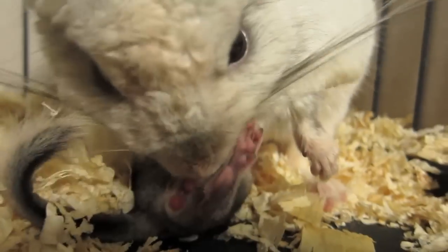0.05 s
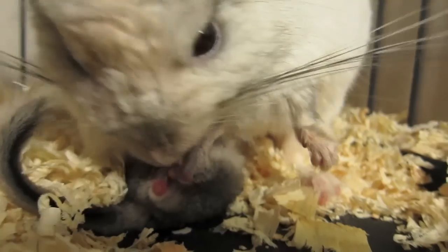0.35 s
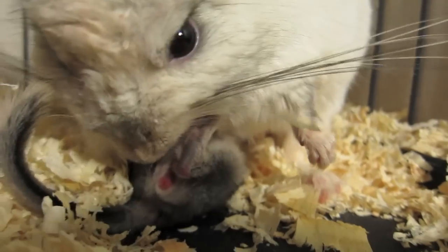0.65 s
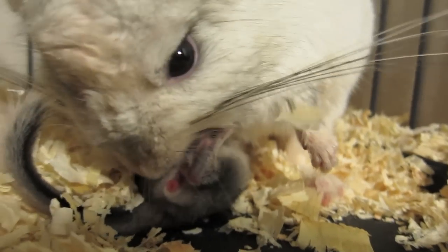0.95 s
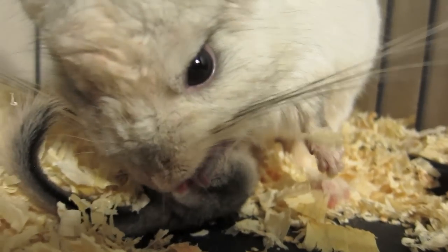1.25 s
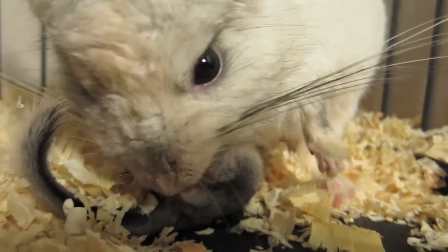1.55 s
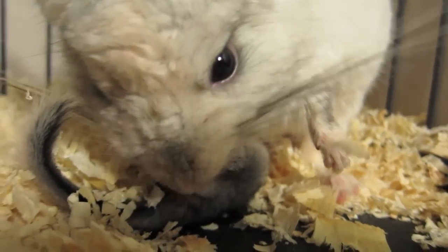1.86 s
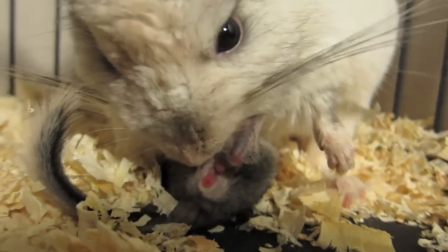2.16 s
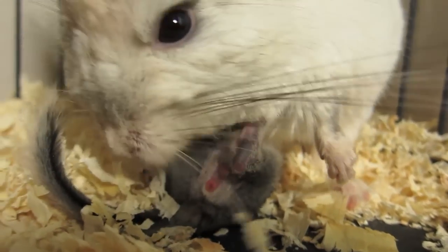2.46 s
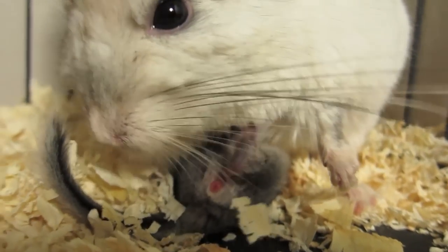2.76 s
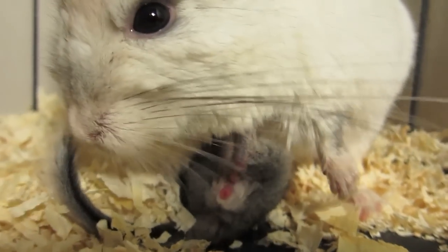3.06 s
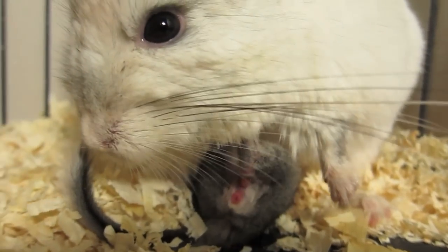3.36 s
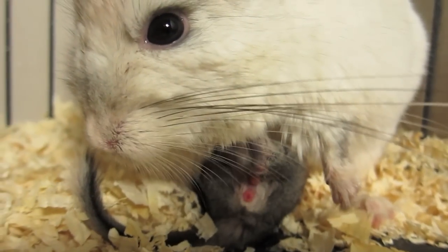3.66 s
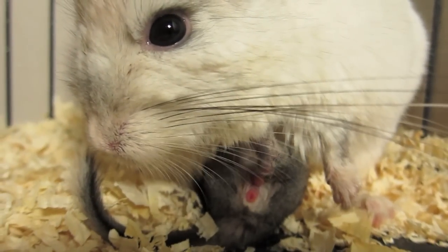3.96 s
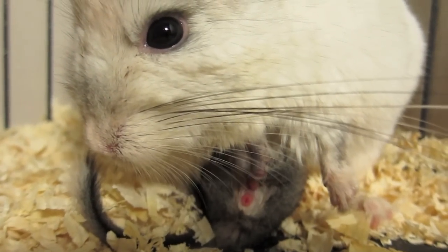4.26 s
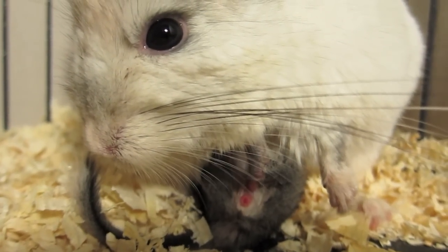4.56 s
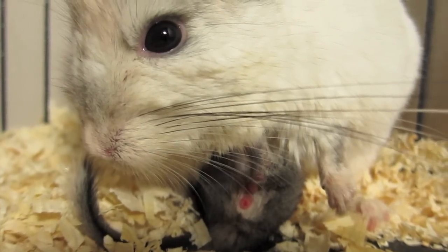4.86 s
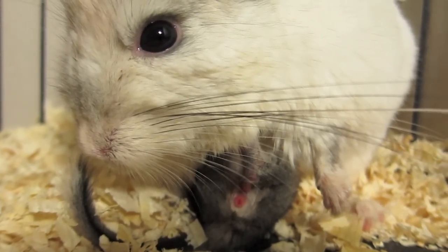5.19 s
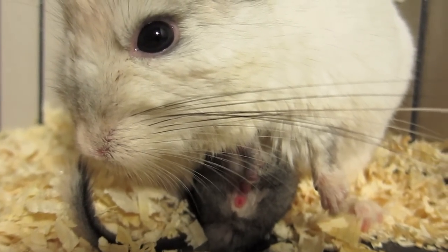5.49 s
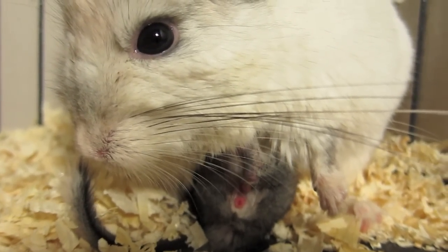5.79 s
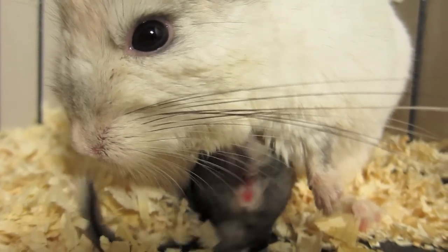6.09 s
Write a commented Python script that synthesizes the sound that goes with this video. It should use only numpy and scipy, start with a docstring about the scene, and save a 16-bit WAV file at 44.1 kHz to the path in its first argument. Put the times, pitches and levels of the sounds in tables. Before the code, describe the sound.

A baby chinchilla gives short harsh squeaks, then soft peeps, amid faint sniffing, soft bumps and crackling wood shavings in a quiet room.

```python
"""A newborn chinchilla under its mother in a cage of wood shavings, in a small room with a low hum.
It opens with two squeaks that start as a thin whistle, drop into a rasp as the vocal folds strain, then
relax. Four shorter calls follow by 2.1 s, while the grooming mother sniffs through narrow nostrils.
From 0.9 s paws bump and shuffle on the padded floor. After 3 s the kit gives only soft, falling peeps,
and the shavings, crackling throughout, end the scene with two dry ticks."""
import sys
import numpy as np
from scipy import signal
from scipy.fft import rfft, irfft
from scipy.io import wavfile
from scipy.ndimage import uniform_filter1d

SR = 44100
rng = np.random.default_rng(int(sys.argv[2]) if len(sys.argv) > 2 else 0)


def transcribe(u):
    """Save the signal u as a 16-bit wav file named by the first command-line argument.

    u: samples, shape (n,) or (channels, n), limited to [-1, 1]; the rate is SR.
    q: integer samples, one column per channel.
    """
    v = np.clip(np.atleast_2d(u).T, -1, 1)
    q = np.round(v * 32767).astype(np.int16)
    wavfile.write(sys.argv[1], SR, q)


N = 270333
TIME = np.arange(N) / SR
TOP_HZ = 15750

# room tone EQ, mid and side: (frequency [Hz], gain [dB])
AIR_MID_EQ = [(25, -12.5), (38, -4.5), (58, 0), (90, -7.5), (170, -10), (270, -13.5), (360, -12),
              (550, -15), (850, -18), (2000, -25.5), (6400, -32.5), (8500, -42), (11000, -35),
              (15500, -42.5)]
AIR_SIDE_EQ = [(25, -1), (55, 1.5), (170, -4), (400, -8), (700, -11), (1600, -16.5), (5000, -22),
               (7500, -28.5), (9000, -26), (15500, -33)]
# stereo balance of the room tone: (frequency [Hz], left minus right [dB])
AIR_BALANCE = [(50, 0), (110, 5), (200, 7.5), (400, 3), (1300, 1.5), (4400, 1.5), (9000, -3), (15000, 0)]
# faint camera whine: (frequency [Hz], wander width [Hz], level [dB])
WHINE_TONES = [(1672, 1.25, -74), (8806, 22.7, -76), (10830, 95, -77.5)]
# early reflections off nearby surfaces: (delay [s], level [dB], left share [0-1])
REFLECTIONS = [(.0075, -19.5, 0), (.024, -26, 0.35), (.034, -17.5, 0.6)]
# crackle EQ of dry shavings: (frequency [Hz], gain [dB])
CRACKLE_EQ = [(500, -4), (1500, 3.5), (4000, 0.5), (7000, -8.5), (11000, -10), (15000, -15)]
# the animals stir the bedding: (peak time [s], length [s], level [dB])
STIRS = [(.27, 0.58, -53), (1.055, 0.37, -51), (1.557, 0.22, -60), (2.047, 0.2, -52), (2.81, .2, -55.5),
         (2.997, 0.077, -54.5), (3.09, 0.061, -53), (3.486, 0.18, -58), (6.1, 0.14, -56)]
# single shavings snapping: (time [s], level [dB], ring [Hz])
SNAPS = [(0.326, -29, 4600), (.457, -36, 3460), (1.8324, -30.5, 5000), (1.9505, -26, 3580),
         (2.0254, -29, 11100), (2.369, -31, 1120), (2.562, -34, 1230), (2.8379, -25.5, 4000),
         (2.853, -35, 3200), (3.071, -35, 786), (3.4377, -31, 9900), (6.0493, -28, 3800),
         (6.0837, -31, 5000)]
# dull EQ of the padded floor: (frequency [Hz], gain [dB])
FLOOR_EQ = [(120, -26), (330, 9), (520, 2), (650, 1.5), (950, -1.5), (1400, -12), (3000, -38), (8000, -47)]
# fur and paws sliding: (time [s], length [s], level [dB])
SHUFFLE_CUES = [(0.933, 0.11, -51.5), (1.064, 0.13, -51.5), (2.742, 0.068, -52), (3.208, 0.086, -49.5),
                (3.804, 0.072, -52.5), (4.684, 0.086, -47), (4.877, 0.12, -51.5), (5.484, 0.044, -51),
                (5.795, 0.19, -51.5), (6.041, 0.098, -52.5)]
# paws and bodies bumping the floor: (time [s], pitch [Hz], level [dB])
BUMP_CUES = [(.932, 438, -22.5), (0.942, 138, -26.5), (.954, 312, -33), (3.246, 365, -34),
             (3.832, 543, -41), (4.715, 400, -39), (4.968, 470, -39), (5.795, 450, -36.5)]
# hiss EQ of the nostrils: (frequency [Hz], gain [dB])
NOSE_EQ = [(400, -1), (900, 8), (2400, 4.5), (3500, -0.5), (5300, 4.5), (7000, 3), (9000, -16),
           (11000, -3.5), (15000, -24)]
# the mother's sniffs: (time [s], length [s], level [dB], whistle pitch [Hz], whistle over hiss [dB])
SNIFF_CUES = [(0.454, 0.23, -50, 6300, -22), (0.663, 0.26, -52.5, 5400, -13), (0.904, 0.13, -48, 6600, -17),
              (1.098, 0.15, -49.5, 6500, -23), (1.396, 0.24, -51.5, 6070, -6), (2.171, 0.15, -50, 6540, -4),
              (2.383, 0.19, -50.5, 7000, -11), (2.689, 0.2, -52.5, 6100, -3)]
# the kit's soft peeps: (time [s], length [s], first pitch [Hz], level [dB])
PEEP_CUES = [(0.474, 0.017, 1080, -46.5), (.901, 0.017, 1045, -46.5), (1.416, 0.017, 1124, -51),
             (1.976, 0.018, 1020, -46), (2.616, 0.02, 1063, -48.5), (2.646, 0.022, 968, -49.5),
             (3.213, .019, 1016, -44), (3.239, 0.041, 878, -49.5), (3.807, .022, 982, -46),
             (4.698, 0.038, 1045, -48)]
# formants of the kit's throat and mouth: (frequency [Hz], gain [dB])
THROAT_EQ = [(500, 11), (800, 3.5), (1250, -5), (1650, 0.5), (2000, 4.5), (2600, -2.5), (3400, -8),
             (4100, -19.5), (4900, -17.5), (5700, -33), (8000, -42)]
# the kit's squeaks: (time [s], length [s], mid-call level [dB], swell [dB], whistle length [s],
# overtones [dB], roughness [0-1], time to peak strain [s], relaxing time [s], release [s])
SQUEAK_CUES = [(0, 0.099, -29, -1.5, .012, 1.5, 0.73, 0.045, 0.0097, 0.018),
               (0.2447, 0.098, -28.5, 0.5, 0.0092, 5.5, 0.93, 0.03, 0.044, 0.0071),
               (0.5128, 0.038, -29.5, -4, 0, -14, .45, 0.017, 0.0094, 0.0061),
               (0.77, 0.034, -37, 6.5, 0.00097, -9, 0.25, 0.011, 0.019, 0.0056),
               (1.3444, .035, -31.5, -1, 0, -27, 0.03, .005, 0.012, 0.012),
               (2.034, 0.063, -28, 28.5, 0, -3, 0.13, 0.0173, 0.015, .018)]
# pitch envelope of the vocal folds, one for each squeak: (scene time [s], pitch [Hz])
PITCH_CURVES = [
    [(0, 1520), (.009, 1540), (.021, 864.6), (.033, 779), (.046, 876), (.06, 908), (.068, 1334),
     (.074, 1300), (.092, 985)],
    [(.2455, 1759), (.256, 985), (.267, 816), (.28, 829), (.288, 981), (.297, 959), (.306, 811),
     (.333, 776), (.341, 660)],
    [(.513, 2397), (.521, 1602), (.526, 963), (.531, 668), (.538, 502), (.546, 567), (.553, 500)],
    [(.772, 1732), (.79, 825), (.802, 676)],
    [(1.3435, 665), (1.356, 763), (1.378, 765)],
    [(2.034, 1652), (2.044, 999), (2.052, 486), (2.065, 543), (2.075, 600), (2.084, 623), (2.09, 824),
     (2.1, 650)],
]


def undb(db):
    """Decibels to gain."""
    return 10 ** (np.asarray(db) / 20)


def unit(x):
    """Scale to rms 1."""
    return x / np.sqrt(np.mean(x ** 2) + 1e-18)


def bell(t, centre, width):
    """A smooth hump of height 1."""
    return np.exp(-((t - centre) / width) ** 2)


def gain_at(hz, eq):
    """Gain of an EQ curve at the given frequencies."""
    points_hz, db = np.transpose(eq)
    return undb(np.interp(np.log(np.maximum(hz, 1)), np.log(points_hz), db))


def colour(x, eq):
    """Run a signal through an EQ curve; rms 1."""
    return unit(irfft(rfft(x) * gain_at(np.fft.rfftfreq(len(x), 1 / SR), eq), len(x)))


def band(size, hz, width):
    """Noise in a bell-shaped band; centred on 0 Hz it is a smooth random modulator."""
    shape = np.exp(-2 * ((np.fft.rfftfreq(size, 1 / SR) - hz) / width) ** 2)
    return unit(irfft(rfft(rng.standard_normal(size)) * shape, size))


def tone(hz, width):
    """A sine of steady level and wandering pitch."""
    return unit(np.sin(2 * np.pi * np.cumsum(hz + width / 2 * band(N, 0, width)) / SR))


def add(track, start, x):
    """Mix a sound into a track at a time in seconds."""
    i = max(int(start * SR), 0)
    track[i:i + len(x)] += x[:max(N - i, 0)]


def room_tone(mid_db=-48, side_db=-51, hum_hz=54, hum_db=-60.5, flutter_db=1):
    """A bed of air leaning left, with a low wavering hum and a camera's faint whine."""
    mid = undb(mid_db + flutter_db * band(N, 0, 20.4)) * colour(rng.standard_normal(N), AIR_MID_EQ)
    side = undb(side_db) * colour(rng.standard_normal(N), AIR_SIDE_EQ)
    mid += undb(hum_db) * tone(hum_hz, width=8.3)
    mid += sum(undb(db) * tone(hz, width) for hz, width, db in WHINE_TONES)
    lean = np.sqrt(gain_at(np.fft.rfftfreq(N, 1 / SR), AIR_BALANCE))
    return irfft(rfft([mid + side, mid - side]) * np.array([lean, 1 / lean]), N)


def room_reverb(x, t60=.44, wet_db=-18, onset_s=.013, smear_s=.00023, right_lag_s=.00003):
    """Early reflections, dulled by the bedding, and a short tail that differs between the ears."""
    t, out = TIME[:SR // 2], []
    envelope = undb(-60 * t / t60) * np.minimum(t / onset_s, 1)
    tail_eq = [(200, -29), (600, -1), (1000, 18.5), (1800, -2), (3000, -5), (10000, 1.5)]
    for ear in range(2):
        tail = colour(rng.standard_normal(len(t)), tail_eq) * envelope
        response = undb(wet_db) * tail / np.sqrt(np.sum(tail ** 2))
        response[int(ear * right_lag_s * SR)] += 1  # direct sound
        for delay, db, left in REFLECTIONS:
            echo = bell(t, delay, smear_s / 2)
            pan = 2 * abs(ear - left)
            response += undb(db) * pan * echo / np.sum(echo)
        out.append(signal.fftconvolve(x, response)[:N])
    return np.array(out)


def shavings(ring_cycles=30, cracks_per_s=420, spread_db=2, settle_db=-75):
    """Dry flakes snap and ring briefly, over a fine crackle that swells with each stir."""
    out, t = np.zeros(N), TIME[:SR // 20]
    for start, db, hz in SNAPS:
        splinter_eq = [(hz / 4, -16), (hz, 0), (hz * 2, -10), (hz * 8, -28)]
        splinter = colour(rng.standard_normal(len(t)), splinter_eq)
        ring = np.sin(2 * np.pi * hz * t)
        decay = undb(-60 * t * hz / ring_cycles)
        add(out, start, undb(db) * (.22 * ring + .42 * splinter) * decay)
    cracks = (rng.random(N) < cracks_per_s / SR) * rng.choice([-1, 1], N)
    strength = undb(spread_db * np.minimum(rng.exponential(size=N), 4))
    stir = undb(settle_db) + sum(undb(db) * bell(TIME, peak, length / 2) for peak, length, db in STIRS)
    return out + colour(cracks * strength, CRACKLE_EQ) * stir


def shuffles(grain_db=3, grain_hz=120):
    """Bodies slide in small uneven steps over the padded floor: dull, grainy noise."""
    out = np.zeros(N)
    for start, length, db in SHUFFLE_CUES:
        size = int(length * SR)
        steps = rng.standard_normal(size) * undb(grain_db * band(size, 0, grain_hz))
        add(out, start, undb(db) * colour(steps, FLOOR_EQ) * signal.windows.tukey(size, .5))
    return out


def bumps(contact_s=.0016, t60=.039):
    """Soft contacts ring the damped cage floor."""
    out, t = np.zeros(N), TIME[:SR // 5]
    envelope = np.minimum(t / contact_s, 1) * undb(-60 * t / t60)
    for start, hz, db in BUMP_CUES:
        add(out, start, undb(db) * np.sin(2 * np.pi * hz * t) * envelope)
    return out


def sniffs(grain_db=2, grain_hz=300, attack_share=.074):
    """Turbulent puffs through narrow nostrils, which whistle most when the flow is fastest."""
    out = np.zeros(N)
    for start, length, db, hz, whistle_db in SNIFF_CUES:
        size = int(length * SR)
        flow = np.interp(np.linspace(0, 1, size), [0, attack_share, .6, 1], [.2, .98, .51, 0])
        hiss = colour(rng.standard_normal(size), NOSE_EQ)
        whistle = undb(whistle_db) * flow ** 2 * band(size, hz, width=200)
        grain = undb(grain_db * band(size, 0, grain_hz))
        add(out, start, undb(db) * (hiss + whistle) * flow * grain)
    return out


def peeps(fall_ratio=.76, waver=.065, waver_hz=360, overtone_db=-20):
    """Nearly pure falling tones, made with the mouth closed."""
    out = np.zeros(N)
    for start, length, first_hz, db in PEEP_CUES:
        size = int(length * SR)
        hz = np.geomspace(first_hz, first_hz * fall_ratio, size) * (1 + waver * band(size, 0, waver_hz))
        phase = 2 * np.pi * np.cumsum(hz) / SR
        peep = np.sin(phase) + undb(overtone_db) * np.sin(2 * phase)
        add(out, start, undb(db) * unit(peep * signal.windows.tukey(size, .5)))
    return out


def voice(hz, whistle, press_db, rough, jitter=.14, jitter_hz=900, shimmer=.55, halving=.9, rasp=.5):
    """Vocal folds buzz through the throat; under strain their cycles turn uneven and air rasps through."""
    size = len(hz)
    phase = 2 * np.pi * np.cumsum(hz * (1 + jitter * rough * band(size, 0, jitter_hz))) / SR
    harmonic = np.arange(1, 13)[:, None]
    press = np.where(harmonic > 1, undb(press_db), 1)  # pressed folds lift every overtone
    weight = gain_at(harmonic * hz, THROAT_EQ) * press * (harmonic * hz < TOP_HZ)
    weight /= np.sqrt(np.sum(weight ** 2, axis=0) / 2)
    # strained folds alternate strong and weak cycles
    uneven = 1 + rough * (shimmer * band(size, 0, jitter_hz) + halving * np.sin(phase / 2))
    full = np.sum(weight * np.sin(harmonic * phase), axis=0) * uneven
    bright_noise = np.diff(rng.standard_normal(size + 1))
    air = colour(bright_noise, [(300, -34)] + THROAT_EQ) * (1 + np.cos(phase))
    thin = np.sqrt(2) * (np.sin(2 * phase) + undb(-28) * np.sin(4 * phase))  # whistle, an octave up
    out = whistle * thin + (1 - whistle) * full + rasp * rough * air
    # the lungs set the power, however rough the tone
    return out / np.sqrt(uniform_filter1d(out ** 2, size=160) + 1e-9)


def squeak(cue, pitch, attack_s=.002, break_s=.004, strain_width_s=.009, strain_db=4.5, relax_db=-24.5,
           register_hz=1150, gap_width_hz=220, gap_db=-11.5, upper_db_per_octave=-30,
           calm_share=.26, wobble=.07, wobble_hz=160, flutter_db=2.5, patch_db=3):
    """One call: the folds strain to a rasp, then relax; a whistled start breaks into full voice."""
    start, length, db, swell_db, whistle_s, overtones_db, roughness, strain_s, relax_s, release_s = cue
    t = TIME[:int(length * SR)]
    hz = uniform_filter1d(np.interp(start + t, *np.transpose(pitch)), size=60)
    whistle = np.clip(.5 - (t - whistle_s) / break_s, 0, 1) * (whistle_s > break_s)
    strain = bell(t, strain_s, strain_width_s)
    relaxed = np.clip(1 - (length - t) / relax_s, 0, 1)
    # roughness comes in patches and shakes both level and pitch
    patches = undb(patch_db * band(len(t), 0, wobble_hz))
    rough = np.clip(roughness * patches * (calm_share + (1 - calm_share) * strain), 0, 1)
    rough *= (1 - .8 * whistle) * (1 - relaxed ** 2)
    flutter = undb(flutter_db * rough * band(len(t), 0, wobble_hz))
    shaky_hz = hz * (1 + wobble * rough * band(len(t), 0, wobble_hz))
    # the full voice weakens between its registers and is purer in the upper one
    gap = bell(hz, register_hz, gap_width_hz) * (.5 - whistle)
    octaves_up = np.maximum(np.log2(hz / register_hz), 0)
    press_db = overtones_db + strain_db * strain + relax_db * relaxed + upper_db_per_octave * octaves_up
    level = undb(db + swell_db * (t / length - .5) + gap_db * gap)
    attack = np.minimum(t / attack_s, 1)
    release = np.sin(np.pi / 2 * np.minimum((length - t) / release_s, 1)) ** 2
    return level * flutter * attack * release * voice(shaky_hz, whistle, press_db, rough)


def kit():
    """The newborn's voice: loud squeaks and soft peeps."""
    out = np.zeros(N)
    for cue, pitch in zip(SQUEAK_CUES, PITCH_CURVES):
        add(out, cue[0], squeak(cue, pitch))
    return out + peeps()


def scene():
    """Kit and floor sit centre; crackle and sniffs scatter round the cage, unrelated in each ear."""
    scattered = np.array([shavings() + sniffs() for ear in range(2)])
    centre = kit() + bumps() + shuffles()
    return room_reverb(centre) + scattered + room_tone()


def record(dry):
    """Master EQ: a narrow treble notch and a steep high cut."""
    notch = signal.butter(4, (7700, 8700), "bandstop", fs=SR, output="sos")
    high_cut = signal.ellip(10, .2, 80, TOP_HZ, fs=SR, output="sos")
    return signal.sosfilt(np.vstack([notch, high_cut]), dry)


dry = scene()
out = record(dry)
transcribe(out)
```